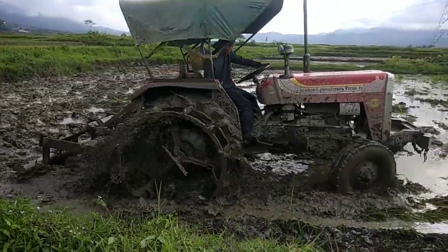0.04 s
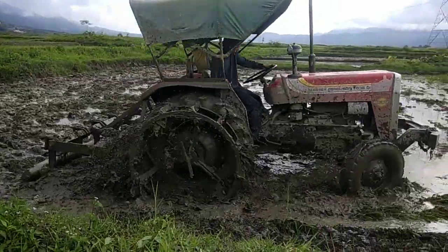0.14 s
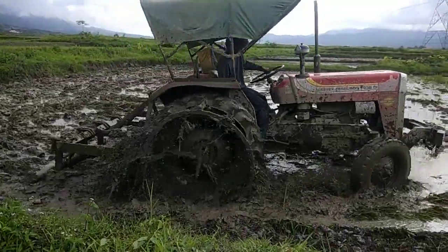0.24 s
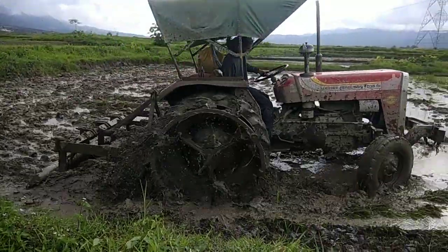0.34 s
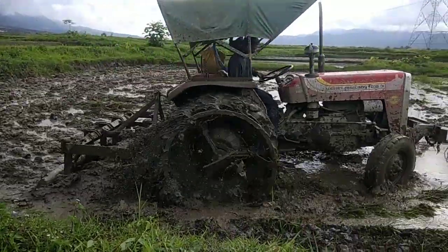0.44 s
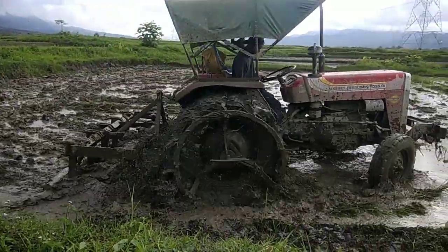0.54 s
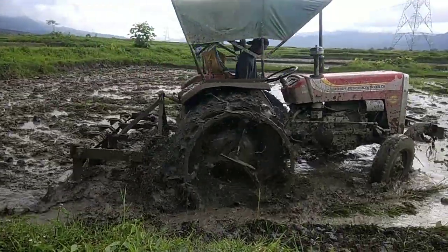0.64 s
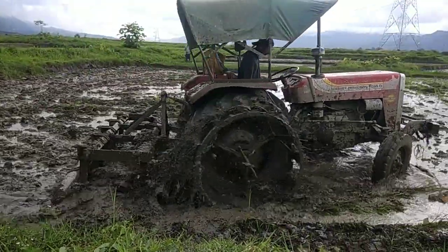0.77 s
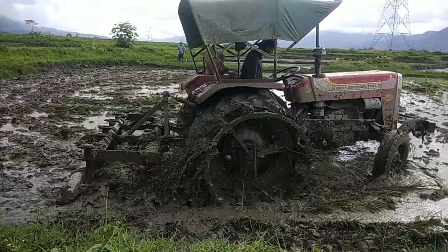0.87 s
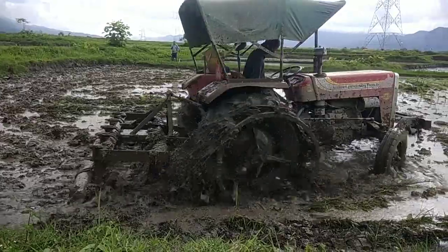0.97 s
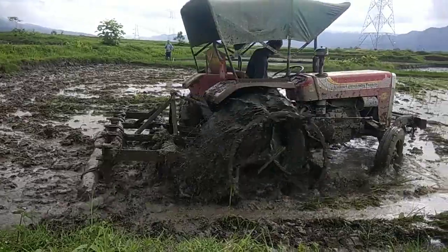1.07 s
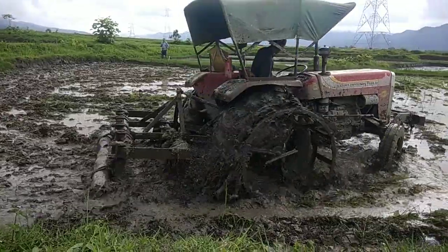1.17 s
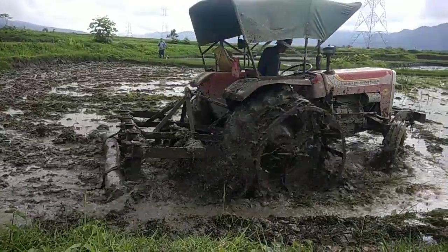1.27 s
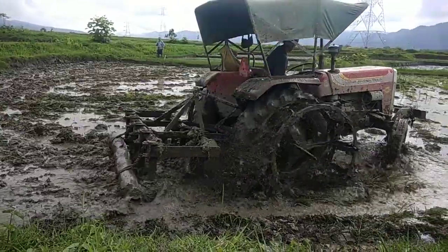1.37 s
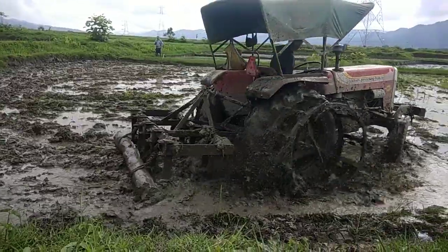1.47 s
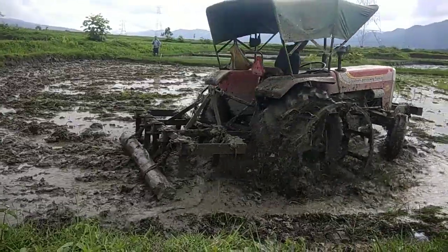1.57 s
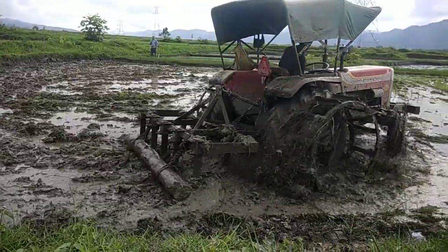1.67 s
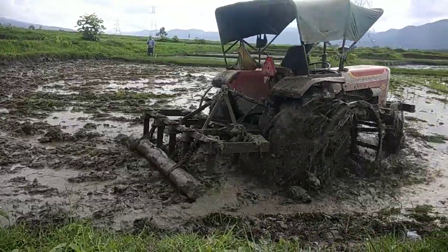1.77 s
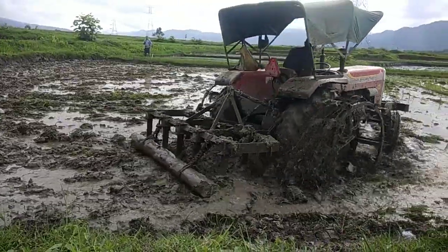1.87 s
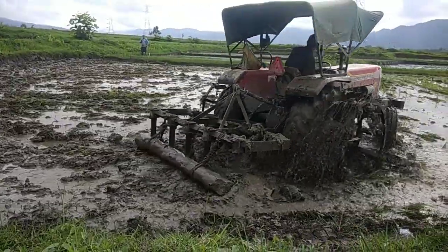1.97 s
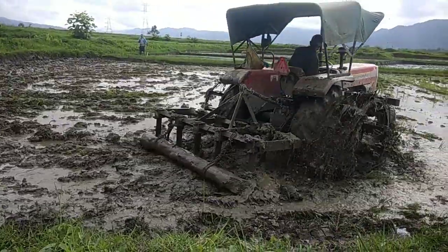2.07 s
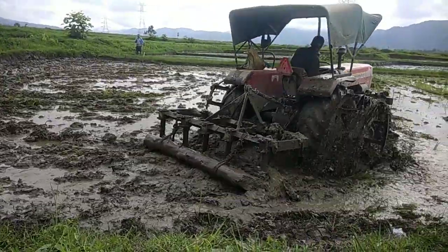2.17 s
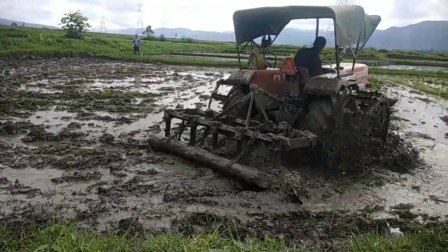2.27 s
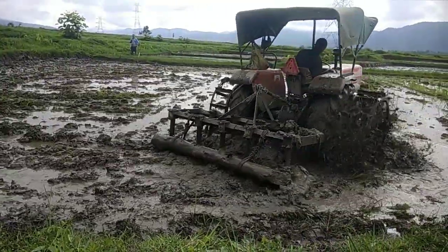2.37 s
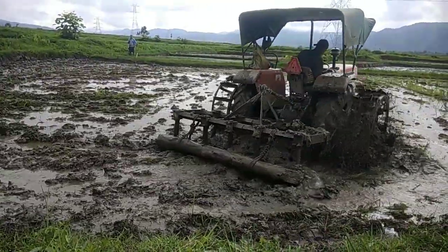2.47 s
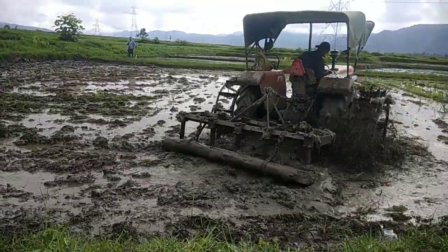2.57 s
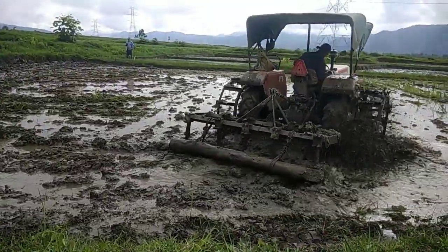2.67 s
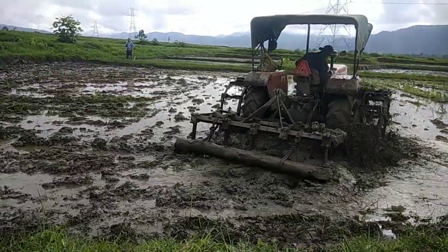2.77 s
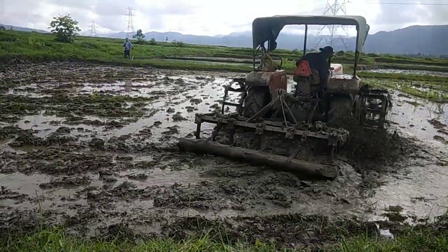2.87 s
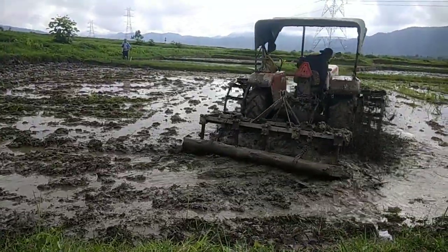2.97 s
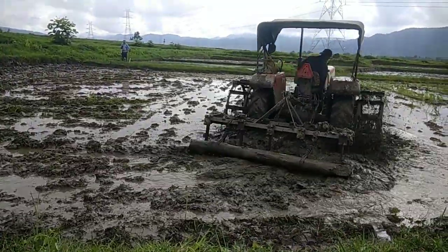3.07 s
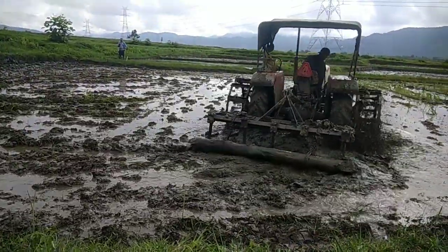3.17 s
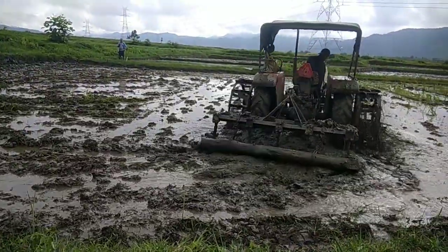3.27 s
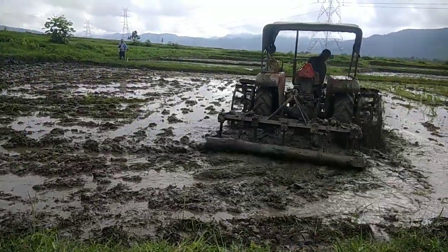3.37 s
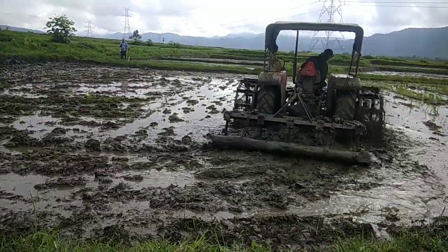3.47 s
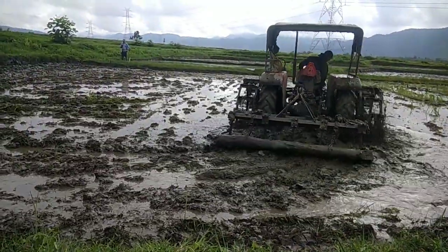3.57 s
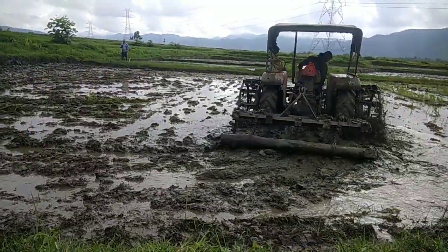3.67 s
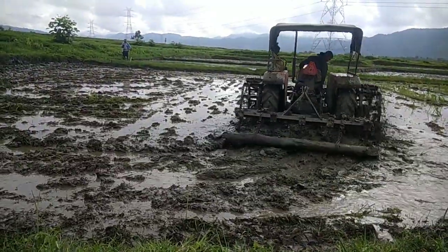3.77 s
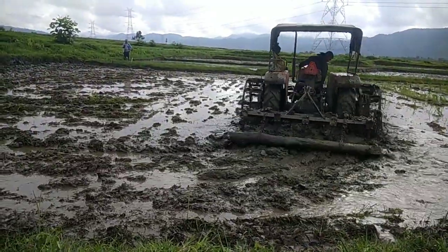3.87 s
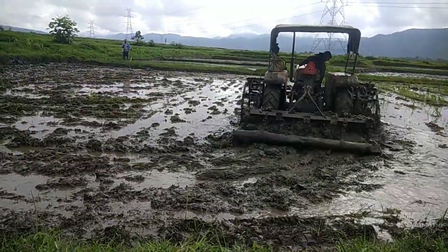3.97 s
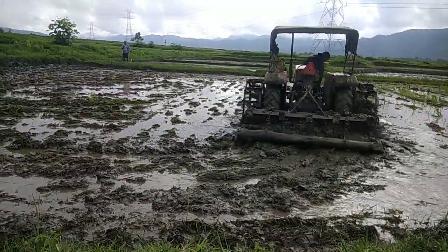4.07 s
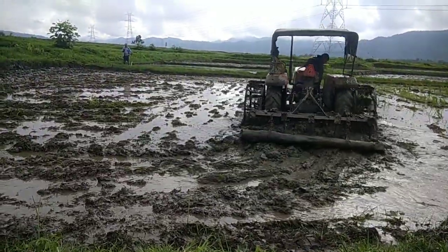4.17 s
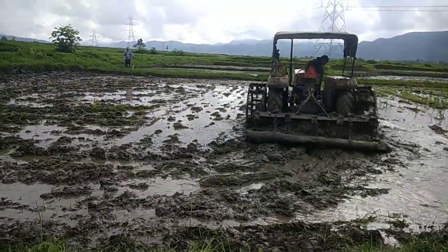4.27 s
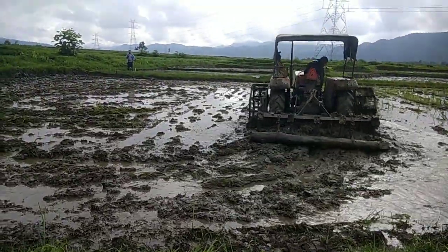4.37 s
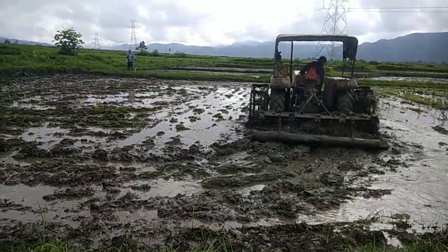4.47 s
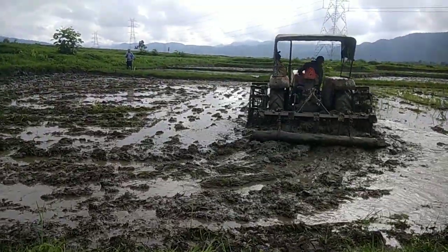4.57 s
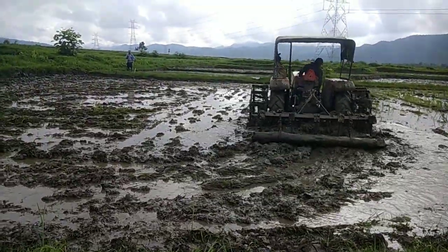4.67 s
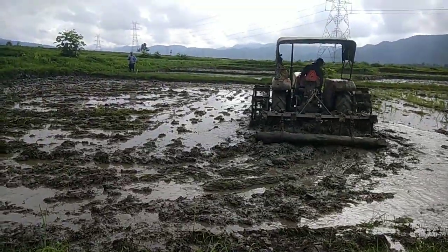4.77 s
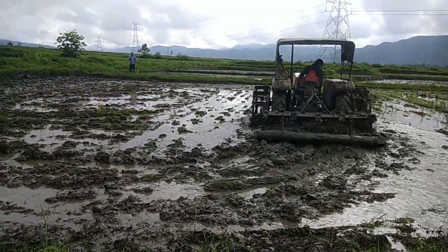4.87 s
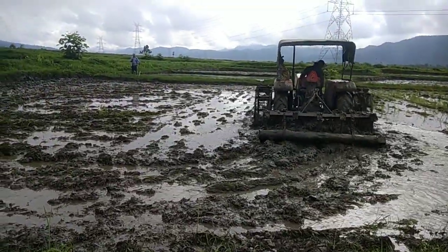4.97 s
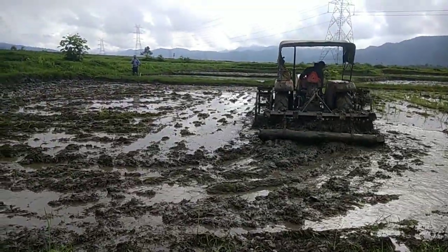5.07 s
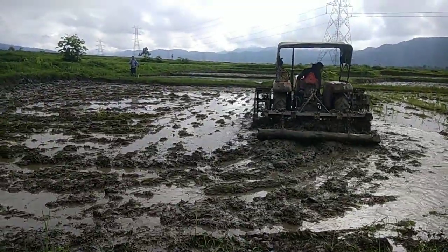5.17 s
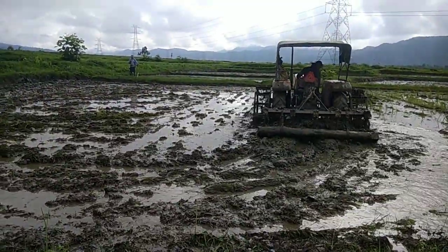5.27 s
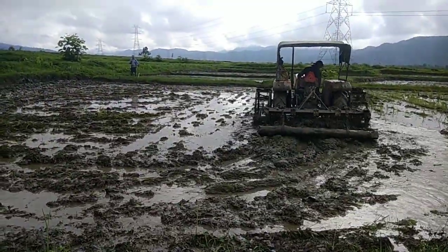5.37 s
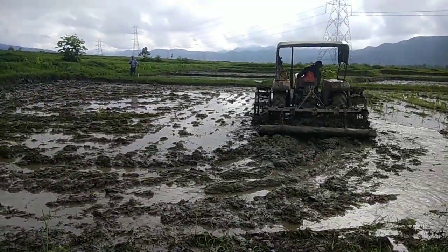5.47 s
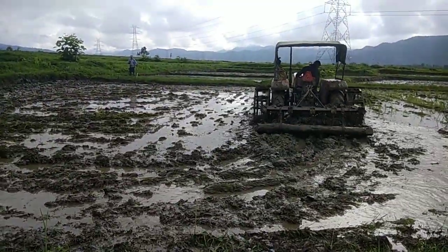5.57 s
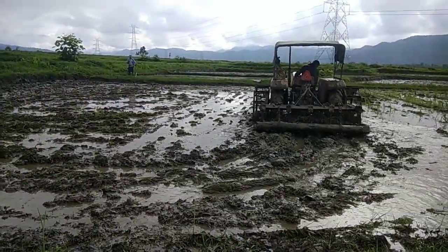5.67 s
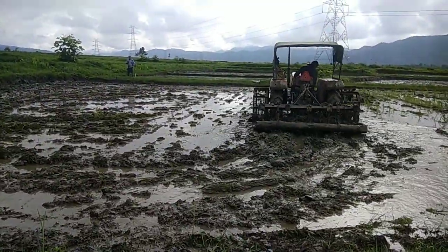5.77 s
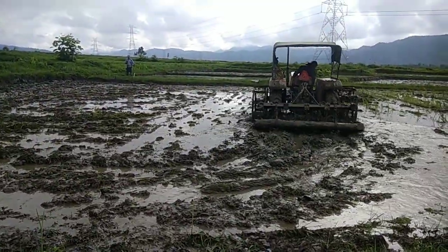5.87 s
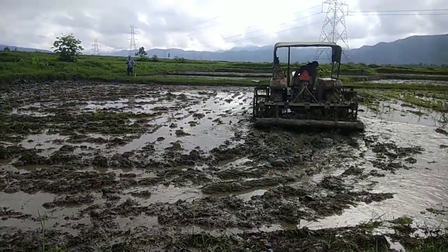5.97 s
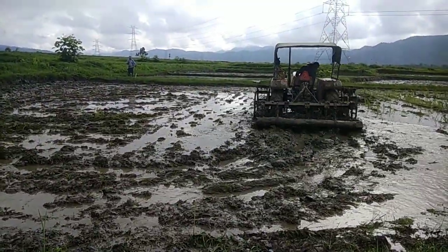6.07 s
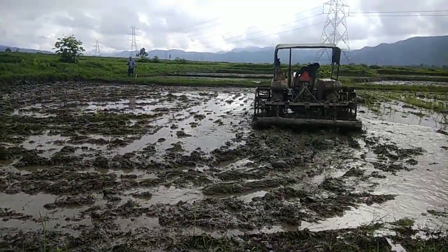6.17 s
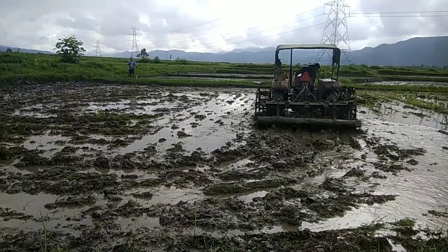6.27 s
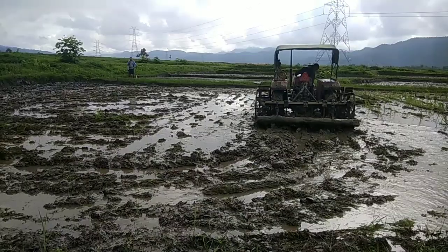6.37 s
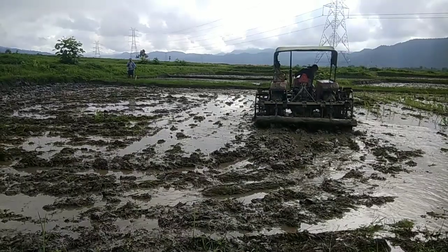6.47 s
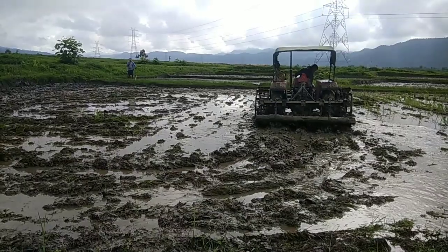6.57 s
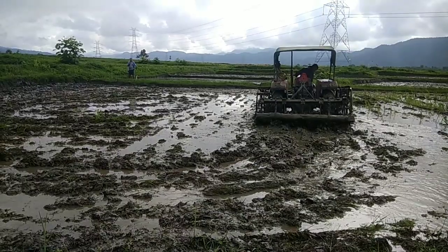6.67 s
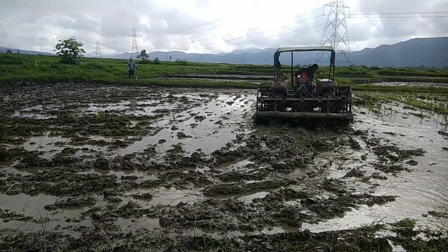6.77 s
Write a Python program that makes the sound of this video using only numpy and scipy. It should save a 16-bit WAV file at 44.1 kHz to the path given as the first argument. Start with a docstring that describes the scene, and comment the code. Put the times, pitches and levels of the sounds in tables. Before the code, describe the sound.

From 0 s a diesel tractor is very close and loud, working under load in a flooded field. A rough exhaust throb surges unevenly, with short puffs, over a midrange engine-block roar, a wavering low whine and bright, crackling fan and churned-water noise. From about 0.7 s it steadily recedes; lumps of roar still swell around 1 to 1.5 s. Near 2 s the throb and whine drop sharply, and by 2.5 s dry metallic knocks emerge from the thinning wash. From 3 to 4.5 s the knocks are rapid and uneven, about 35 to 39 per second, with loose valve rattle and a thin low beat. The engine slows to about 30 firings per second by 5.7 s. Water hiss and rattle sink away, leaving crisp, distant clatter over a faint steady field background until the end at 6.8 s. Stereo phone microphone, outdoors, without obvious reverberation.

```python
"""Throb, roar and splash of a three-cylinder diesel tractor dragging a harrow through a flooded field,
close to a phone; then it turns and drives off, leaving a dry diesel knock and a thin low beat.
Exhaust: orders of the firing rate plus noise puffs. Block: noise through ring bands that fade one by one.
Fan and churned water: shaped noise. Knock: noise bursts per firing plus struck-metal modes; valve rattle between.
A low whine follows the engine; a faint steady field background lies under everything."""
import sys
import numpy as np
from scipy import signal
from scipy.fft import rfft, irfft, next_fast_len
from scipy.io import wavfile
from scipy.ndimage import uniform_filter1d, map_coordinates

SR = 44100
rng = np.random.default_rng(int(sys.argv[2]) if len(sys.argv) > 2 else 0)


def master_out(mix):
    """Clip the mix to full scale and print it as 16-bit PCM to the path in sys.argv[1]."""
    frames = np.transpose(np.atleast_2d(mix))
    ceiling = np.clip(frames, -1, 1)
    pcm = np.round(ceiling * 32767).astype(np.int16)
    wavfile.write(sys.argv[1], SR, pcm)


N = 301203
TIME = np.arange(N) / SR  # s
LEFT_RIGHT = np.array([[.5], [-.5]])  # splits a left-right dB between the ports
LAG_S = .001  # scatter in onset between parts of the metal

# borders between the metal parts that knock [f/Hz]
SPLITS_HZ = [2100, 2700, 3500, 5000, 7200]
# knocks that stand out once the roar has cleared
# [t/s, peak/dB, then level of each metal part against the peak/dB, low to high]
HARD_KNOCKS = [(2.3943, -22, -18, -4, -12, -22, -19, -18), (2.4482, -24.5, -16, -11, -24, -20, -12, -16),
               (2.5006, -23, -17, -4, -20, -22, -13, -18), (2.6079, -17, -13, -19, -13, -17, -16, -10),
               (2.659, -23, -8, -21, 1, -19, -13, -10), (2.6835, -24, -19, -23, -5, -18, -15, -17),
               (2.7336, -25, -9, -18, -10, -15, -12, -10), (2.7596, -12, -17, -15, -14, -26, -17, -15),
               (2.8402, -17.5, -12, 0, -26, -20, -16, -19), (2.9117, -14, -12, -17, -21, -10, -9, -15),
               (2.9421, -20, -20, -14, -18, -17, -11, -14), (2.9655, -18, -19, -2, -13, -17, -14, -13),
               (2.9918, -13.5, -25, -7, -9, -21, -14, -20), (3.0424, -12.5, -29, -5, -26, -21, -13, -20),
               (3.067, -19, -22, -20, -19, -12, -5, -15), (3.1216, -18, -14, -15, -10, -13, -11, -10),
               (3.1468, -11, -29, -12, -13, -20, -14, -18), (3.1965, -16.5, -24, -7, -18, -21, -13, -14),
               (3.223, -13, -20, -4, -10, -22, -20, -26), (3.2723, -16, -19, -8, -20, -12, -15, -22),
               (3.2988, -13.5, -12.5, -9, -17, -15, -13, -20), (3.377, -16, -28, -9, -15, -16, -11, -17),
               (3.4305, -16.5, -14, -17, -7, -16, -12, -14), (3.4557, -11, -26, -13, -8, -21, -12, -13.5),
               (3.507, -14, -26, -9, -6.5, -16, -14, -8), (3.5335, -15, -20, -20, -6, -22, -11, -6.5),
               (3.5593, -17, -19, -29, -10, -15, -16, -9), (3.5847, -19.5, -21, -27, -17, -9, -9, -5),
               (3.612, -14, -25, -35, -3.5, -14, -10, -14), (3.6375, -19, -18, -30, -17, -14, -14, -11),
               (3.664, -17.5, -12, -20, -14, -14, -10.5, -15), (3.691, -12, -30, -18, -8, -14, -15, -14),
               (3.7436, -17.5, -5, -11, -24, -12, -14, -18), (3.7692, -11.5, -21, -8, -25, -15, -8.5, -16),
               (3.8241, -15, -17, -13, -4, -23, -8.5, -17), (3.8496, -9, -12, -17, -19, -17, -14, -19),
               (3.93, -13, -13, -12, -14, -10, -16, -15), (3.9857, -21, -16, -21, -8, -6, -23, -11),
               (4.0133, -9.5, -17, -26, -11, -24, -16, -15), (4.0675, -14, -16, -6, -15, -14, -15, -16),
               (4.0947, -10.5, -15, -14, -13, -23, -10.5, -17), (4.124, -18.5, -8, -6, -16, -23, -21, -16),
               (4.1514, -14, -22, -13, -10, -19, -18, -17), (4.1796, -13.5, -26, -13, -6.5, -19, -12, -20),
               (4.2067, -19, -23, -13, -14, -17, -12, -11), (4.235, -15.5, -26, -8, -9, -22, -12, -25),
               (4.2638, -11, -24, -12, -9, -26, -14.5, -22), (4.291, -16.5, -18, -7, -17, -16, -15, -16),
               (4.3185, -16, -23, -4.5, -10, -27, -10, -27), (4.3478, -10.5, -22, -10, -7.5, -22, -21, -21),
               (4.3754, -17, -17, -14, -8.5, -18, -19, -14), (4.4018, -24, -8, -3, -10, -16, -14, -6),
               (4.4317, -14.5, -26, -6, -10, -15, -15, -12), (4.4597, -17.5, -16, -6, -12, -17, -14, -13),
               (4.4893, -16.5, -21, -11, -6, -19, -16, -20), (4.518, -13, -37, -3, -13, -15, -20, -13.5),
               (4.5456, -15.5, -46, -6, -20, -20, -7, -13), (4.5734, -17.5, -32, -6, -8, -16, -12, -15),
               (4.6033, -11, -21, -5, -18, -17, -13, -17), (4.6333, -11.5, -19, -10, -16.5, -22, -15, -18),
               (4.663, -14.5, -19, -13, -9, -15, -19, -17),
               (4.6926, -8.5, -21, -11.5, -13, -25, -19, -18.5), (4.722, -18, -27, -17, -11, -21, -13, -12),
               (4.751, -17, -20, -5, -15, -21, -12, -15), (4.7825, -15, -12.5, -16, -8.5, -15, -12, -12),
               (4.8105, -20, -16, -13, -10, -18, -17, -8.5), (4.8413, -17.5, -15, -13, -4, -20, -16, -13),
               (4.872, -17, -25, -20, -6.5, -22, -9, -9.5), (4.9308, -21.5, -19, -3, -13, -24, -9, -9),
               (4.962, -10.5, -27, -8, -12, -25, -10.5, -17), (5.0213, -17, -13, -7, -10, -21, -17, -16),
               (5.0515, -11, -22, -14, -20, -20, -12.5, -12.5), (5.0817, -19, -19, -13, -12, -21, -11, -6),
               (5.1127, -20.5, -14, -13, -14, -21, -10.5, -10),
               (5.1441, -12.5, -18, -6.5, -22, -18, -14, -11), (5.174, -17, -19, -11, -22, -15, -13, -10),
               (5.205, -19, -16, -2, -16, -10, -17, -10), (5.2376, -13, -20, -8, -15, -17, -10, -9),
               (5.3037, -19, -15, 1, -13, -19, -12, -8.5), (5.3637, -19, -15, -10, -15, -19, -11, -10),
               (5.3955, -19, -21, -1, -10, -23, -15, -14), (5.429, -15.5, -34, -5, -20, -14, -13, -11),
               (5.4624, -20.5, -32, -11, -15, -15, -12.5, -6.5), (5.494, -26, -14, -2, -13, -9, -14, -10),
               (5.5276, -12, -14, -11, -23, -17, -24, -18), (5.5611, -14.5, -16, -14, -23, -15.5, -18, -15),
               (5.5953, -30.5, 3, -4, -8, -14, -7, -5), (5.629, -13.5, -12, -11, -16, -27, -11, -15),
               (5.664, -22, -19, -17, -4, -14, -13, -5.5), (5.6968, -18, -20, -8, -6, -23, -19, -14),
               (5.731, -14.5, -16, -5, -13, -21, -18, -12.5), (5.7632, -18.5, -14, -11, -15, -18, -22, -10),
               (5.798, -23, -8, -4, -12, -21, -17, -8), (5.833, -16, -15, -12, -8, -23, -18, -13),
               (5.866, -26, -15, -1, -7, -20, -12, -9), (5.9015, -18, -20, -6.5, -6, -27, -19, -17),
               (5.9355, -16.5, -14, -22, -3.5, -22, -17, -13), (5.9662, -21, -30, -19, -8, -23, -9, -11),
               (6.002, -20, -20, -13, -8, -33, -12, -13), (6.0325, -17.5, -20, -18, -9, -17, -10, -4),
               (6.0663, -19.5, -19, -22, -8.5, -24, -7.5, -7.5), (6.1028, -22.5, -9, -25, -8, -18, -8, -7),
               (6.1357, -17, -17, -34, -7, -10, -14, -8), (6.1673, -22, -16, -29, -11, -21, -11, -7),
               (6.2017, -26.5, -24, -20, -3, -12, -7, -2), (6.2339, -17, -16, -7, -15, -17, -13, -5),
               (6.267, -21, -20, -14, -10, -18, -12, -7), (6.3005, -20, -13, -14, -9, -18, -16, -9),
               (6.3339, -13.5, -15, -8, -25, -17.5, -16, -12.5),
               (6.3658, -17.5, -17, -15, -17, -20, -14, -8.5), (6.4002, -22.5, -9, -21, -9, -28, -16, -10),
               (6.4336, -19, -10, -24, -9, -26, -9, -9.5), (6.4672, -19.5, -17, -20, -16, -29, -8.5, -10),
               (6.5005, -31, 0, -11, -7, -22, -6, -3), (6.5325, -16, -11, -24, -8, -26, -12.5, -13),
               (6.5653, -19, -17, -13, -11, -29, -11, -10), (6.6, -20.5, -22, -17, -5.5, -28, -14, -12),
               (6.6322, -18.5, -14.5, -13, -14, -14, -12, -10.5),
               (6.6665, -22.5, -14, -23, -8, -22, -16, -8), (6.6996, -22.5, -19, -23, -1, -16, -16, -19),
               (6.7317, -17, -16, -11, -11.5, -16, -10.5, -14), (6.7652, -19, -27, -14, -10, -14, -15, -14),
               (6.7982, -22, -20, -10, -11, -15, -11, -13)]


def amp(db):
    """dB to amplitude gain."""
    return 10 ** (np.asarray(db) / 20)


def unit(x):
    """Scale to rms 1."""
    return x / np.sqrt(np.mean(x ** 2) + 1e-20)


def along(points, hz):
    """Interpolate (f/Hz, value) points on a log frequency axis."""
    f, v = np.transpose(points)
    return np.interp(np.log(hz + 1), np.log(f + 1), v)


def curves(rows):
    """Interpolate each column after the time to one value per sample."""
    s, *cols = np.transpose(rows)
    return [np.interp(TIME, s, c) for c in cols]


def filtered(x, response):
    """Multiply the spectrum of x by response(f/Hz)."""
    m = next_fast_len(N + 8192)
    return irfft(rfft(x, m) * response(np.fft.rfftfreq(m, 1 / SR)), m)[..., :N]


def noise(gain, balance, patchy_db):
    """Stereo noise of rms 1 with narrow drifting dips: shared in the bass, each port's own in the treble."""
    # left-right likeness [f/Hz, correlation]
    likeness = [(25, 0.98), (60, 0.89), (300, 0.92), (640, 0.97), (1400, 0.96), (3000, 0.23), (8000, 0.036),
                (15000, 0.069)]
    lead_s = .0001  # left port hears it first
    hz, _, z = signal.stft(rng.standard_normal((2, N)), SR, nperseg=512)
    angle = np.arccos(np.clip(along(likeness, hz), -1, 1))[:, None] / 2

    def ports(a, b):
        common, own = np.cos(angle) * a, np.sin(angle) * b
        return np.array([common + own, common - own])

    patches = uniform_filter1d(rng.standard_normal(z.shape), size=2, axis=1)
    patches = uniform_filter1d(patches, size=24, axis=2)
    patch_db = patchy_db * np.minimum(unit(ports(*patches)), .7)  # rises capped, dips free
    pair = signal.istft(ports(*z) * amp(patch_db), SR, nperseg=512)[1][:, :N]

    def response(f):
        lead = np.exp(2j * np.pi * f * lead_s * LEFT_RIGHT)
        return gain(f) * amp(along(balance, f) * LEFT_RIGHT) * lead

    return unit(filtered(pair, response))


def waver(depth_db, hz):
    """Random gain: straight dB lines between hz random points a second."""
    knots = rng.standard_normal(2400)
    return amp(depth_db * map_coordinates(knots, [TIME * hz], order=1))


def fading(near_db, loss_db_per_s, drop_s, drop_db_per_s, far_db, drift=1):
    """Gain over time: steady loss, then a faster drop to a constant remainder."""
    loss_start_s = 0.71
    loss_db = loss_db_per_s * np.maximum(TIME - loss_start_s, 0)
    drop_db = drop_db_per_s * np.maximum(TIME - drop_s, 0)
    return np.hypot(amp(near_db - loss_db - drop_db) * drift, amp(far_db))


def swells(rows):
    """Gain of Gaussian power bumps [t/s, peak/dB, half length to 1/e power/s]."""
    step = 64  # samples per envelope point
    power = np.zeros(N // step + 1)
    t = np.arange(len(power)) * step / SR
    for s, db, half_s in rows:
        power += amp(2 * db) * np.exp(-((t - s) / half_s) ** 2)
    return np.interp(np.arange(N) / step, np.arange(len(power)), np.sqrt(power))


def crank():
    """Integrate engine speed to firings so far at every sample."""
    # engine speed [t/s, firing rate/Hz]
    speed = [(0, 42.98), (.4, 41.4), (1.3, 39.62), (2, 39.15), (2.45, 38.07), (2.8, 39.16), (3.3, 38.83),
             (3.7, 37.82), (4.1, 36.12), (4.4, 35.34), (4.8, 33.4), (5.1, 32.75), (5.4, 30.83),
             (5.7, 29.42), (6.2, 30.16), (6.83, 30.1)]
    start_firings = -.45
    return start_firings + np.cumsum(curves(speed)[0]) / SR


def bursts(fired, width_s, tail_s, tail_db, scatter_db, hard=(), level_db=np.zeros(N)):
    """Firing envelope: swell, dying clatter and loose tap; each hard knock replaces its nearest firing."""
    # knock strength per cylinder [level/dB]
    cylinder_db = [-3, -4.5, -6.5]
    tap_s, tap_db, tap_scatter_db = (.008, .02), -10, 2.5  # earliest and latest delay; level against knock
    rise_s = .0065  # firing to top of knock
    number = np.floor(fired + .3).astype(int)
    starts = np.flatnonzero(np.diff(number) > 0)
    chance = rng.standard_normal((400, 4))[:len(starts)]
    where = starts.copy()
    db = level_db[starts] + np.take(cylinder_db, (number[starts + 1] + 1) % 3) + scatter_db * chance[:, 0]
    for s, peak_db in hard:
        at = round((s + .0015 - rise_s) * SR)
        k = np.argmin(np.abs(starts - at))
        where[k], db[k] = at, peak_db
    where = np.abs(where + np.round(LAG_S * SR * chance[:, 1]).astype(int))
    late_s = np.interp(np.tanh(chance[:, 2]), [-1, 1], tap_s)
    blows = np.zeros(N + SR)
    blows[where + (late_s * SR).astype(int)] = amp(db + tap_db + tap_scatter_db * chance[:, 3])
    blows[where] = amp(db)
    t = np.arange(SR // 10) / SR - rise_s
    swell = np.exp(-.5 * (t / width_s / np.where(t < 0, .78, 1.1)) ** 2)  # rises faster than it falls
    clatter = amp(tail_db) * np.exp(-np.maximum(t, 0) / tail_s) * np.where(t < 0, swell, 1)
    return np.abs(signal.fftconvolve(blows, swell + clatter)[:N])


def exhaust(fired):
    """Clean low orders of the firing rate through the pipe; early on a louder, rougher throb with puffs."""
    # pipe response [f/Hz, level/dB]
    pipe = [(55, -23), (80, -3), (115, 1.5), (150, 2.5), (190, -1.5), (230, -9.5), (300, -14)]
    # beat level [t/s, level/dB, extra for orders above the fourth/dB]
    beat_level = [(0, -59, -4), (1.2, -56, -6), (2.15, -55.5, -2), (2.9, -53, -3), (3.6, -54.5, -2),
                  (4.64, -53.5, -5.5), (5.69, -56, -2), (6.83, -58, -2)]
    # throb [multiple of firing rate, relative level/dB]
    throb_orders = [(4, 12.5), (5, 13.5), (6, 12), (7, 8)]
    # throb decay [start level/dB, loss/(dB/s), drop t/s, further loss/(dB/s), remaining level/dB]
    throb_fade = (-36, 9, 2, 92, -60)
    # throb surges [t/s, peak/dB, half length/s]
    surges = [(.05, -37, 0.027), (.23, -22.5, 0.035), (.42, -30.5, 0.12), (.53, -23.5, 0.024),
              (.64, -30, 0.034), (.79, -29.5, 0.022), (.89, -30, 0.013), (.97, -40, 0.014),
              (1.21, -34, 0.074), (1.29, -48, 0.023), (1.43, -29.5, 0.041), (1.63, -45, 0.017),
              (1.76, -35, 0.053), (1.88, -40, 0.037), (2.07, -43, 0.023), (3.31, -39, 0.0089),
              (3.58, -53, 0.029)]
    rate_hz = np.gradient(fired) * SR
    beat_db, upper_db = curves(beat_level)
    beat = 0
    for k in range(2, 9):
        gain = amp(along(pipe, k * rate_hz) + (k > 4) * upper_db)
        beat = beat + gain * waver(1, 5.1) * np.cos(2 * np.pi * k * (fired - .15))
    throb = sum(amp(db) * np.cos(2 * np.pi * k * (fired - .3)) for k, db in throb_orders)

    def puff_band(hz):
        return (.04 + 1 / (1 + (145 / (hz + 1)) ** 12)) / (1 + (hz / 270) ** 10)

    puff = noise(puff_band, [(100, -2.1)], patchy_db=3.5)
    surge = np.hypot(fading(*throb_fade), swells(surges))
    return amp(beat_db) * unit(beat) + surge * (0.5 * unit(throb) + 0.39 * puff)


def block(fired):
    """Combustion noise, swelling a little at each firing, rings in the block; the rings fade one by one."""
    # rings [f/Hz, width/Hz, left-right/dB]
    ring_bands = [(424, 212, -1.5), (601, 157, -1), (799, 176, 5), (960, 83, 1), (1118, 167, 2.5),
                  (1296, 194, -2), (1570, 280, 15)]
    # ring decay, low to high
    # [start level/dB, loss/(dB/s), drop t/s, further loss/(dB/s), remaining level/dB], before the firing swell
    ring_fades = [(-40.5, 6.8, 4.1, 60, -62.5), (-31.5, 6.7, 2, 75, -63.5), (-27.5, 3.6, 3.42, 15, -75),
                  (-37.5, 8.9, 1, 44, -71), (-24, 8.95, 6.9, 10, -80), (-29, 2.85, 1.06, 5.1, -63),
                  (-29, 4, 1.3, 33, -63)]
    # lumps of roar in the ring nearest in pitch [t/s, f/Hz, peak/dB, half length/s]
    lumps = [(0.008, 802, -21.5, .04), (0.028, 1118, -31, 0.048), (0.56, 600, -40, 0.043),
             (0.663, 1118, -21, 0.034), (0.882, 417, -36, 0.067), (1.023, 802, -30, 0.028),
             (1.095, 1118, -26, 0.06), (1.12, 417, -39, 0.013), (1.327, 600, -27, 0.013),
             (1.34, 1118, -29, 0.037), (1.483, 600, -27, 0.032), (1.52, 1118, -27, 0.035),
             (1.707, 600, -30.5, 0.049), (1.8, 1118, -34, 0.025), (1.923, 802, -40, 0.21),
             (2.01, 417, -30.5, 0.021), (2.033, 1118, -31, 0.018), (2.133, 802, -32, 0.057),
             (2.254, 600, -33.5, 0.029), (2.284, 1293, -35.5, 0.14), (2.383, 1293, -54, 0.031),
             (2.402, 417, -45, 0.016), (2.487, 802, -48, 0.015), (2.476, 600, -42, 0.022),
             (2.84, 600, -46, 0.074), (3.058, 600, -45, 0.045), (3.592, 417, -50, 0.025),
             (3.843, 600, -48, 0.026), (4.025, 417, -49, 0.013), (0.312, 802, -27.5, 0.08),
             (0.4, 600, -46, .1), (0.717, 600, -35.5, 0.15), (2.95, 417, -41.5, 0.015),
             (3.124, 1118, -32.5, 0.069), (3.162, 802, -34, 0.075), (3.265, 600, -28.5, 0.019),
             (3.24, 1293, -39.5, 0.048), (3.335, 417, -46, 0.02), (3.536, 1118, -39, 0.044),
             (3.653, 1118, -28, 0.021), (3.65, 600, -57, 0.019), (3.865, 802, -36, 0.022),
             (3.955, 1293, -37.5, 0.036), (4.041, 802, -33.5, 0.016), (4.047, 1118, -40.5, 0.07),
             (4.698, 1293, -48, 0.25), (5.28, 1293, -43.5, 0.14), (5.942, 1293, -49, 0.037),
             (6.583, 1293, -50.5, 0.18)]
    firing = bursts(fired, width_s=0.0095, tail_s=0.0081, tail_db=-13, scatter_db=3)
    swell = 0.71 + 0.21 * unit(firing)
    burn = noise(np.ones_like, [(hz, side_db) for hz, _, side_db in ring_bands], patchy_db=3)
    depth_db = 4.5 * np.clip(TIME / 2.6, .45, 1)  # deepens until 2.6 s

    def nearest(pitch_hz):
        return min(ring_bands, key=lambda ring: abs(ring[0] - pitch_hz))[0]

    rings = []
    for fade, (hz, width_hz, _) in zip(ring_fades, ring_bands):
        own_lumps = [(s, db, half_s) for s, pitch_hz, db, half_s in lumps if nearest(pitch_hz) == hz]
        gain = np.hypot(fading(*fade, waver(depth_db, 15)), swells(own_lumps))
        ring = filtered(burn, lambda f: 1 / (1 + (2 * (f - hz) / width_hz) ** 4))
        rings.append(gain * unit(ring))
    *low, turning, top = rings
    pan_db = np.maximum(-6 * TIME, -22)  # ring near 1.3 kHz drifts right
    grit = waver(1.1, 150)  # fast crackle
    return swell * grit * (sum(low) + top + turning * amp(pan_db * LEFT_RIGHT))


def whine(fired):
    """Wavering tone locked to a fixed multiple of the firing rate."""
    # decay of the tone's peak
    # [start level/dB, loss/(dB/s), drop t/s, further loss/(dB/s), remaining level/dB]
    whine_fade = (-33, 5.5, 1.77, 47, -80)
    order = 43 / 3  # times the firing rate
    return fading(*whine_fade, waver(2.4, 8.86)) * np.cos(2 * np.pi * order * fired)


def rush(fired, top_db):
    """Fan and churned water: shaped noise, part of it swelling with each firing."""
    # spectrum [f/Hz, relative density/dB]
    rush_shape = [(840, -42), (1500, -1), (1750, 3.5), (1950, 4.5), (2100, -3), (2300, 3.5), (2750, 4.5),
                  (3040, -6.5), (3500, 3), (4350, -0.5), (4910, -9), (5320, -5.5), (7540, -6),
                  (10800, -2.5), (13300, -6), (14900, -11), (15500, -3.5)]
    # balance [f/Hz, left-right/dB]
    near_side = [(1300, -10), (2400, 6.5), (4400, 3), (7000, 10.5), (10000, 6), (15000, 14.5)]
    # decay, before pulse and crackle
    # [start level/dB, loss/(dB/s), drop t/s, further loss/(dB/s), remaining level/dB]
    rush_fade = (-14, 6.5, 4.5, 11.5, -75)
    pulse_share = .38
    water = noise(lambda hz: amp(along(rush_shape, hz)), near_side, patchy_db=5.5)
    pulse = unit(bursts(fired, width_s=.004, tail_s=.01, tail_db=-6, scatter_db=3))
    crackle = waver(2.2, 300)
    water = fading(*rush_fade) * water * crackle * (1 - pulse_share + pulse_share * pulse)
    high = filtered(water, lambda hz: 1 / (1 + (5500 / (hz + 1)) ** 4))
    return water + (amp(top_db) - 1) * high


def knock(fired, knock_db, top_db):
    """Knock of each firing, as noise bursts in six metal parts, with valve rattle between and cracks on top."""
    # spectrum [f/Hz, relative density/dB]
    knock_shape = [(1100, -68), (1500, -20), (1800, -6.5), (2100, -7), (2400, 6.5), (3050, 3), (3550, -7.5),
                   (3900, -5), (5600, 2), (6700, -1.5), (7250, -22), (8100, -6), (12000, -10.5),
                   (15500, -12.5)]
    # balance [f/Hz, left-right/dB]
    far_side = [(1300, -12), (1800, -27.5), (2150, 48), (2500, -2.5), (3000, 9.5), (3800, -8), (6500, -1.5),
                (7500, 13), (8800, 7), (9700, 12), (10800, 7), (12500, 8.5), (15000, 14)]
    # rattle sinks under the knock [t/s, level against knock/dB]
    rattle_level = [(0, 18), (3.3, -2), (4.3, -5), (5.4, -15), (6.83, -21.5)]
    # low parts trade strength [t/s, offset near 1.8 kHz/dB, near 2.4 kHz/dB, near 3 kHz/dB]
    part_levels = [(0, -1, 1.5, 3), (1.6, 5, -6, 5), (2.5, 2.5, -10, -10), (2.8, 5.5, -4, -4),
                   (3.1, 0, -7, 3), (3.5, -0.5, -13, 5.5), (3.8, 5, -10, 6), (4.201, 3, -2.5, 4),
                   (4.55, -16, 7, -8), (4.8, 6, 1, 6), (5.1, -4, 1, 6), (5.4, -3, -4, 8), (5.6, 3, 3, 2),
                   (5.8, 7, -6, 8.5), (6.1, -1, -15, 11), (6.35, 13, -1, 12), (6.6, 3, -13, 3),
                   (6.83, -5, -6, 4.5)]
    # noisy share of a hard knock, per part [level/dB]
    hard_noise_db = [-6, -10.5, -9, -6, -6, -2]
    # burst shape, per part [swell/s, clatter decay/s, clatter level/dB]
    shapes = [(.0034, .014, -6), (.0035, .017, -4), (.0033, .012, -7), (.0031, .012, -7), (.0031, .012, -7),
              (.003, .012, -7)]
    echo_s = 0.001615  # bounce off the water; peaks every 620 Hz

    def metal_gain(hz):
        bounce = np.abs(1 + .68 * np.exp(-2j * np.pi * hz * echo_s))
        return amp(along(knock_shape, hz)) * bounce

    metal = noise(metal_gain, far_side, patchy_db=5)
    splits_hz = np.reshape(SPLITS_HZ, (-1, 1, 1))
    below = [0, *filtered(metal, lambda hz: 1 / (1 + (hz / splits_hz) ** 16)), metal]
    cycle = (fired + 1.15) / 3 % 1  # one turn per three firings
    # level steps up once every three firings, then ebbs
    rattle = amp(knock_db + curves(rattle_level)[0] + 3 - 6 * cycle)
    s, peak_db, *hard_db = np.transpose(HARD_KNOCKS)
    parts_db = curves(part_levels) + [0, 0, top_db]
    out = cracks()
    for shape, own_db, noise_db, part_db, low, high in zip(
            shapes, hard_db, hard_noise_db, parts_db, below, below[1:]):
        band = high - low
        share_db = 10 * np.log10(np.mean(band ** 2)) + part_db
        hard = zip(s, peak_db + own_db + noise_db)
        beat = bursts(fired, *shape, scatter_db=3, hard=hard, level_db=knock_db + share_db)
        out = out + np.hypot(beat, rattle * amp(share_db)) * waver(1.2, 8) * unit(band)
    return out


def treble(fired):
    """Rush and knock together; colour and balance shift as the machine turns."""
    # [t/s, knock level/dB, left-right (mean removed below)/dB, extra level at the top/dB]
    treble_level = [(0, -38, 4, 1), (.7, -34.5, 6.5, 0), (1.8, -37, 9, 1.5), (2.6, -29.5, 9, 4),
                    (3.05, -25.5, 10, 3), (3.7, -25, 9.5, 3.5), (4.2, -27, 9, 0), (4.5, -29, 9, 3),
                    (5, -23, 9, 2), (5.4, -27.5, 6, 5.5), (5.7, -28, 8, 7), (6, -31, 8, -4),
                    (6.3, -27.5, 7.5, -2), (6.83, -28, 10.5, -0.5)]
    knock_db, pan_db, top_db = curves(treble_level)
    mix = rush(fired, top_db) + knock(fired, knock_db, top_db)
    return mix * amp((pan_db - np.mean(pan_db)) * LEFT_RIGHT)


def field():
    """Faint steady background: shaped noise."""
    # spectrum [f/Hz, relative density/dB]
    field_shape = [(20, -9), (45, 0), (130, 9), (300, 1), (550, 0), (900, 4.5), (1300, 8.5), (1600, -23),
                   (2200, -30), (4000, -120)]
    return amp(-54) * noise(lambda hz: amp(along(field_shape, hz)), [(60, 0), (1500, 0.5)], patchy_db=2.5)


def cracks():
    """Hard knocks ring metal modes, each with its own onset and pitch scatter, out of step at the ports."""
    # struck metal [f/Hz, relative level/dB, t60/s]
    modes = [(1854, -2.5, 0.038), (2336, -9, 0.067), (2952, 1, 0.041), (4350, -2, 0.028), (5660, 1, 0.026)]
    crack_db, pitch_spread, rise_s = 6.5, 0.042, .002  # level against the part it rings in; relative pitch
    out, t = np.zeros((2, N + SR)), np.arange(SR // 25) / SR
    hz, db, t60_s = np.transpose(modes)[..., None]
    part = np.searchsorted(SPLITS_HZ, hz[:, 0])
    chances = rng.standard_normal((len(HARD_KNOCKS), 5, len(modes), 1))
    for (s, peak_db, *parts_db), chance in zip(HARD_KNOCKS, chances):
        at = round((s - 2 * rise_s) * SR)
        u = np.maximum(t - LAG_S * np.abs(1 + chance[4]), 0)  # s since the mode's onset
        mode_db = db + np.take(parts_db, part)[:, None] + 0.76 * chance[0] - 60 * u / t60_s
        ring = amp(mode_db) * (1 - np.exp(-u / rise_s)) ** 2
        phase = 2 * np.pi * hz * (1 + pitch_spread * chance[1]) * t + 1.12 * chance[2:4]
        out[:, at:at + len(t)] += amp(peak_db + crack_db) * np.sum(ring * np.sin(phase), axis=1)
    return out[:, :N] * amp(3 * LEFT_RIGHT)


def scene():
    """Tractor, all layers driven by one crank, over the field background."""
    fired = crank()
    return exhaust(fired) + block(fired) + whine(fired) + treble(fired) + field()


def record(dry):
    """Phone: rounds off the highest peaks, keeps almost nothing above its band limit."""
    top_hz = 15520
    soft = dry / (1 + np.abs(dry / .9) ** 4) ** (1 / 4)
    return filtered(soft, lambda hz: 1 / (1 + (hz / top_hz) ** 300))


dry = scene()
out = record(dry)
master_out(out)
```